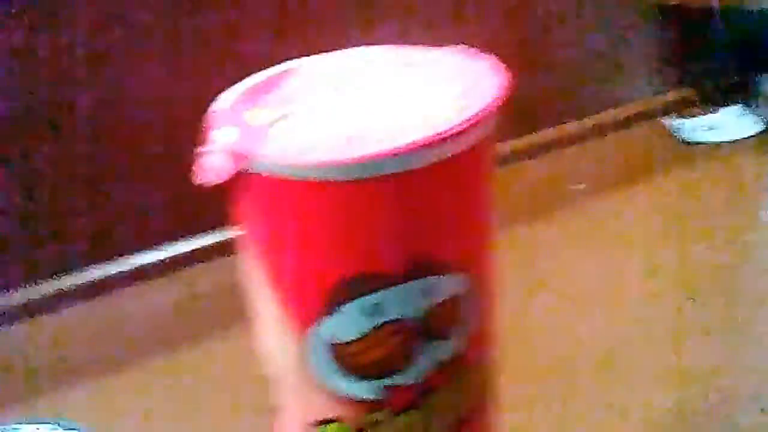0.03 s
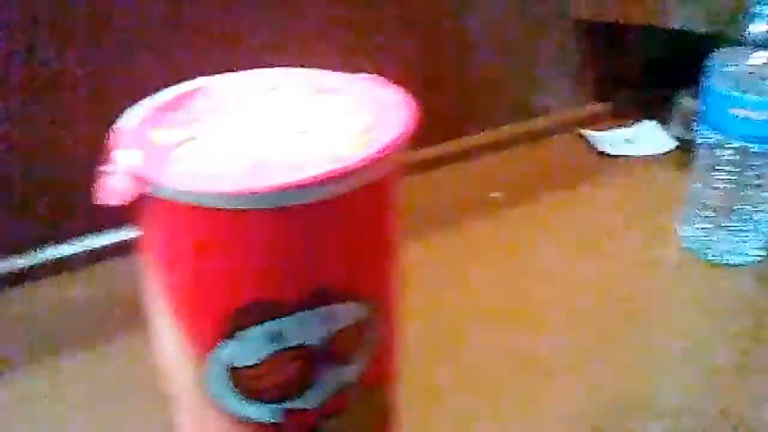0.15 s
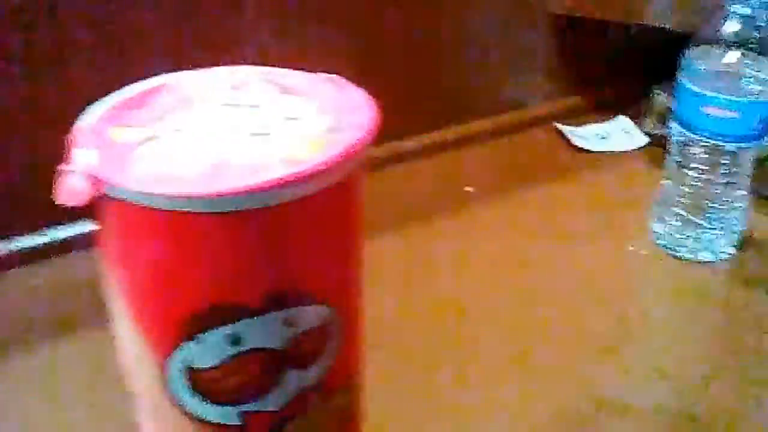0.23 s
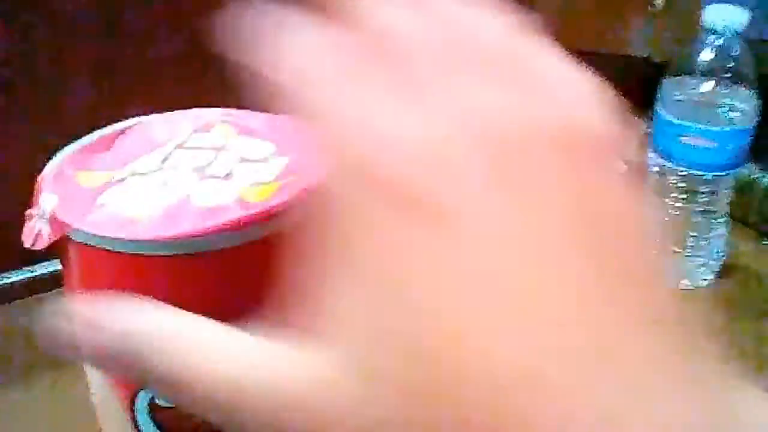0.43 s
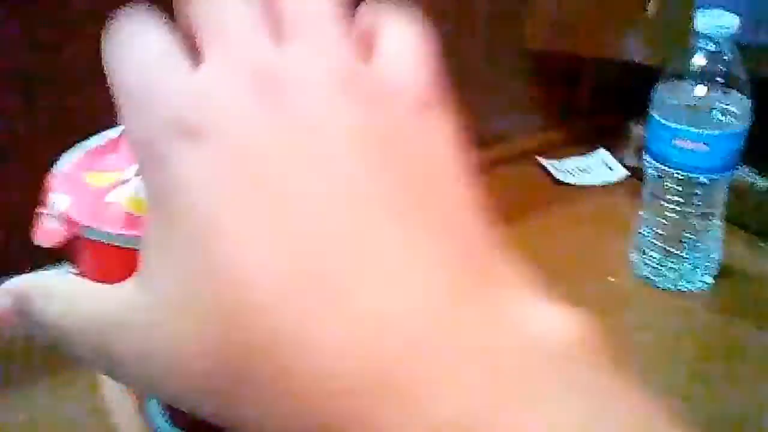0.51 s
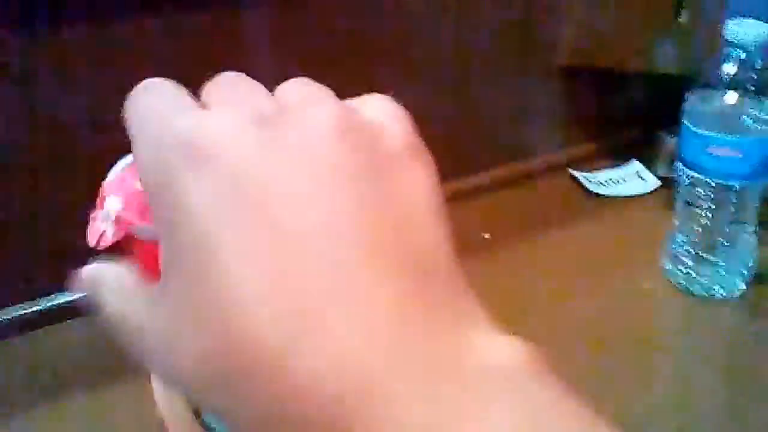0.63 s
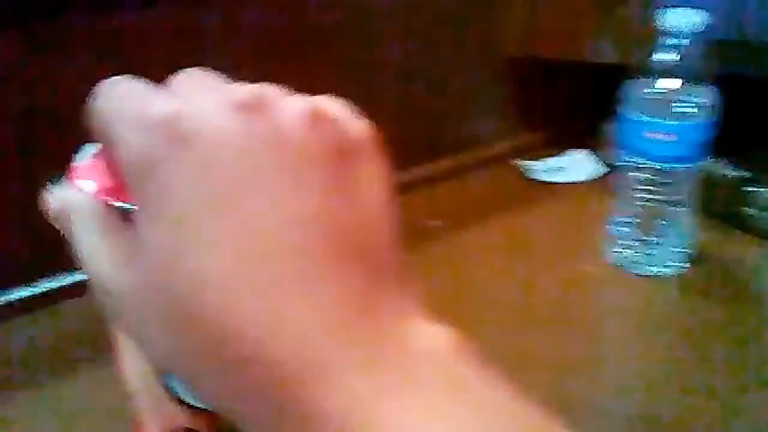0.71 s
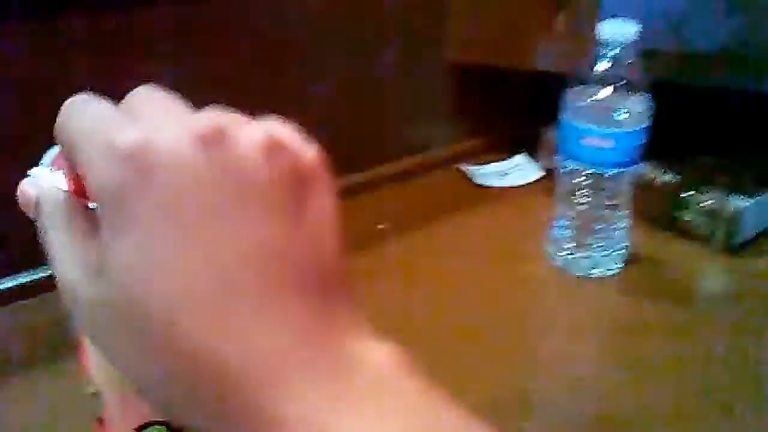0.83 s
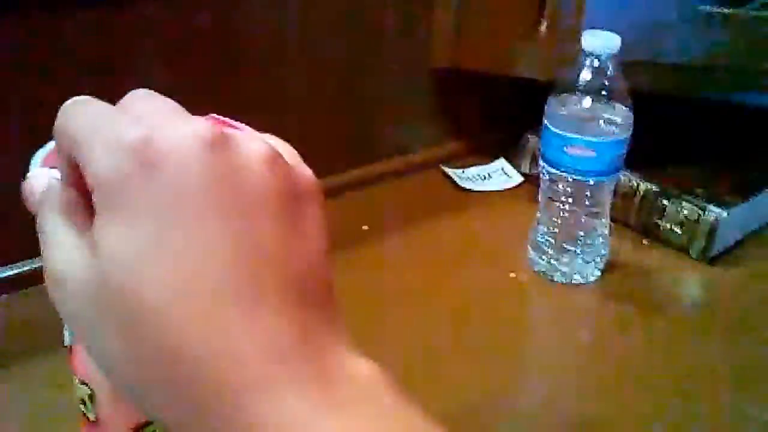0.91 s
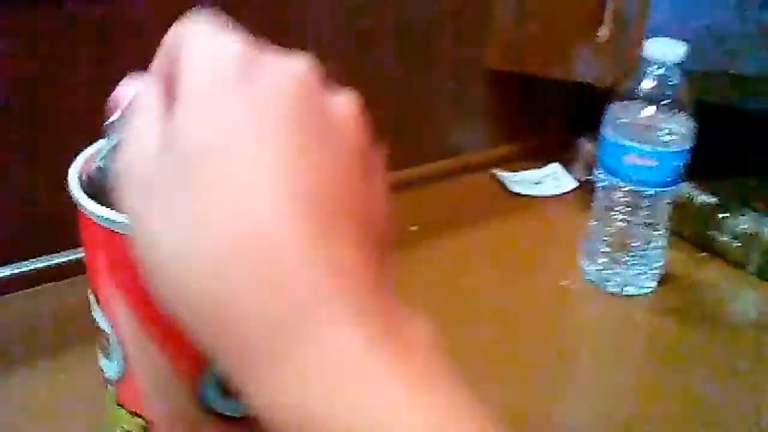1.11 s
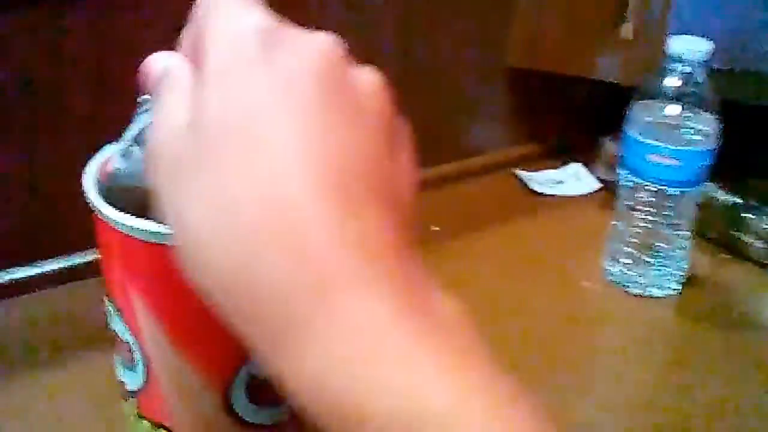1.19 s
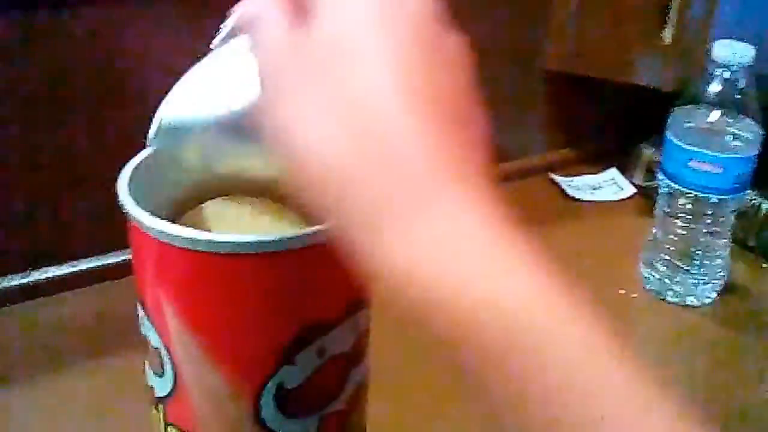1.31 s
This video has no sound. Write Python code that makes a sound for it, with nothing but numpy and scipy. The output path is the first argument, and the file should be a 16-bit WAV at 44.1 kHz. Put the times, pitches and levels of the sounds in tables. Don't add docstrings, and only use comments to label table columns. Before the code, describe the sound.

Close phone capture of a snack can lid coming off indoors: hand scraping and squeaking on the resonant tube, a near-quiet moment with a faint foil brush, then quick stepped cracks, crisp ticks and dwindling crinkles over faint hiss.

```python
import sys
import numpy as np
from scipy import signal
from scipy.fft import rfft, irfft, next_fast_len
from scipy.io import wavfile
from scipy.ndimage import uniform_filter1d, map_coordinates

SR = 44100
rng = np.random.default_rng(int(sys.argv[2]) if len(sys.argv) > 2 else 0)


def int16_out(signal):
    q = np.round(np.clip(np.atleast_2d(signal).T, -1, 1) * 32767)
    wavfile.write(sys.argv[1], SR, q.astype(np.int16))


def boost_factor(decibels):
    exponent = np.asarray(decibels, float) / 20
    return 10 ** exponent


N = 59535

# (time [s], level [dB])
RUB_EFFORT = [(0.0, -55), (0.026, -56.5), (0.052, -42.5), (0.112, -35.5), (0.178, -38), (0.232, -26),
              (0.302, -28), (0.33, -20.5), (0.354, -22), (0.362, -20), (0.378, -22.5), (0.418, -19.5),
              (0.526, -23), (0.666, -39), (0.742, -49.5), (0.78, -47), (0.866, -60), (0.88, -69.5)]
# (pitch [Hz], width [Hz], level [dB])
OPEN_MOUTH = [(635, 160, -11), (1280, 330, -6), (2280, 200, -3), (3700, 380, 4), (6100, 400, -12),
              (7400, 500, -9)]
LID_OFF_S = 1.03
GRIP_CHANGE_S = 0.024


def unit(x):
    return x / np.sqrt(np.mean(x ** 2) + 1e-20)


def along(points, hz):
    f, v = np.transpose(points)
    return np.interp(np.log(hz + 1), np.log(f + 1), v)


def level(rows):
    s, db = np.transpose(rows)
    after = db[-1] if s[-1] > 1 else -120
    return boost_factor(np.interp(np.arange(N) / SR, s, db, left=-120, right=after))


def fade(start, end, ramp_s):
    t = np.arange(N) / SR
    return np.clip(np.minimum(t - start, end - t) / ramp_s + .5, 0, 1)


def wobble(rate):
    knots = rng.standard_normal(int(N * rate / SR) + 4)
    return map_coordinates(knots, [np.arange(N) * rate / SR])


def filtered(x, response):
    m = next_fast_len(x.shape[-1] + 8192)
    spectrum = rfft(x, m) * response(np.fft.rfftfreq(m, 1 / SR))
    return irfft(spectrum, m)[..., :x.shape[-1]]


def body(peaks):
    def ring(f, k, c, w, db):
        return (-1) ** k * boost_factor(db) * 1j * f * w / (c * c - f * f + 1j * f * w)
    return lambda f: sum(ring(f, k, *peak) for k, peak in enumerate(peaks))


def colour(points):
    return lambda hz: boost_factor(along(points, hz))


def grit(grain_db, slow_db, patchy_db):
    x = rng.standard_normal(N) * boost_factor(grain_db * wobble(900) + slow_db * wobble(70.76))
    z = signal.stft(x, nperseg=256)[2]
    patches = uniform_filter1d(rng.standard_normal(z.shape), size=3, axis=0)
    patches = uniform_filter1d(patches, size=5, axis=1)
    return unit(signal.istft(z * boost_factor(patchy_db * unit(patches)), nperseg=256)[1][:N])


def hiss():
    # (pitch [Hz], level [dB per Hz])
    hiss_tone = [(24, -51), (40, 1), (886, -9), (1210, -1.5), (2760, -38), (3610, -32), (13000, -36)]
    return boost_factor(-66) * unit(filtered(rng.standard_normal(N), colour(hiss_tone)))


def room(x):
    level_db, t60_s, low_hz = -9.5, 0.39, 1800
    t = np.arange(SR // 3) / SR
    tail = rng.standard_normal(len(t)) * boost_factor(-60 * t / t60_s) * (t > .004)
    thinned = filtered(x, lambda hz: 1j * hz / (low_hz + 1j * hz))
    return boost_factor(level_db) * signal.fftconvolve(thinned, tail / np.linalg.norm(tail))[:N]


def brush():
    # (time [s], level [dB])
    stroke = [(.735, -58), (.756, -50.5), (.78, -43.5), (.82, -47.5), (.866, -54.5), (.885, -54)]
    # (pitch [Hz], width [Hz], level [dB])
    touched_foil = [(1860, 720, -6), (5960, 780, -2.5), (9800, 400, -4.5)]
    ring = body(touched_foil)
    slips = grit(grain_db=1.8, slow_db=0.4, patchy_db=0.2)
    return level(stroke) * unit(filtered(slips, lambda f: ring(f) * abs(ring(f)) ** 1.1))


def ticks():
    # (time [s], peak [dB], pitch [Hz], time to fade by 60 dB [s])
    creases = [(.9139, -21, 6550, .015), (.9196, -26.5, 6030, 0.026), (.9443, -28, 5760, 0.013),
               (.9564, -9.5, 8900, 0.0077), (.9567, -13, 10860, 0.0062), (.9751, -28, 3210, 0.022),
               (1.0426, -18, 3640, .017), (1.0369, -14, 6210, 0.014), (1.0411, -22.5, 2310, 0.033),
               (.8989, -17.5, 3015, 0.019), (.9001, -21.5, 1990, 0.023), (1.0831, -34, 2190, .061),
               (1.0871, -36.5, 560, 0.031), (1.1421, -39, 3710, .041), (1.2461, -49, 5140, .08),
               (1.2864, -43, 5860, .031), (1.2881, -48, 4300, .031), (1.2871, -45, 2000, .041),
               (1.3021, -45, 6410, .024), (1.3061, -39, 5805, 0.026), (1.3351, -48, 4900, .031),
               (.3609, -5, 3550, .0022), (.4296, -10, 4010, .0011), (.4604, -12, 4500, 0.00091),
               (.3266, -10, 5010, 0.0018), (1.0367, -12, 8730, 0.0069), (1.305, -47, 5050, .03)]
    slack_db, slack_from_s = -5, 1.2
    spike_s, spike_db = .8984, -1
    out, t = np.zeros(N + SR), np.arange(SR // 8) / SR
    for s, db, hz, t60 in creases:
        fading = boost_factor(db + slack_db * (s > slack_from_s) - 60 * t / t60)
        onset = np.clip((t + 1 / SR) / t60 * 20, 0, 1)
        out[round(s * SR):][:len(t)] += fading * np.cos(2 * np.pi * hz * t) * onset
    spike = round(spike_s * SR)
    out[spike] += boost_factor(spike_db)
    out[spike + 1:][:40] -= boost_factor(spike_db) / 40
    return out[:N]


def peel():
    # (time [s], level [dB])
    rustle = [(.88, -64), (.897, -56), (.902, -42), (.947, -50), (.955, -58), (.962, -39), (1.024, -43),
              (1.028, -56), (1.036, -62), (1.044, -38), (1.085, -38), (1.14, -45), (1.19, -56),
              (1.235, -64), (1.25, -57), (1.27, -57), (1.29, -51), (1.35, -51)]
    # (pitch [Hz], level [dB per Hz])
    foil_tone = [(35, -54), (100, -9.5), (550, -10), (2000, -5), (5000, -4.5), (13000, -14.5)]
    t = np.arange(N) / SR
    slips = grit(grain_db=2, slow_db=1.5, patchy_db=1.5)
    opened = (t > LID_OFF_S) * (t < 1.275)
    plain = boost_factor(-9 * opened) * unit(filtered(slips, colour(foil_tone)))
    ringing = boost_factor(-0.5) * opened * unit(filtered(slips, body(OPEN_MOUTH)))
    return boost_factor(4.5) * level(rustle) * (plain + ringing)


def snaps():
    # (time [s], peak [dB], crack's time to fade by 60 dB [s], note [Hz], note over crack [dB])
    releases = [(0.892, -26, 0.025, 743, 1.5), (.898, -14.5, 0.04, 794, -0.5),
                (0.8983, -23.5, 0.036, 2890, 8), (0.9026, -16.5, 0.013, 1220, 4),
                (0.9129, -12.5, 0.033, 6230, -8), (0.919, -15.5, 0.067, 1215, 0.5),
                (0.9426, -20, 0.012, 1290, -2), (.956, -6, .05, 5500, 4.5), (0.976, -17.5, 0.089, 3360, 0),
                (1.0205, -34, .03, 800, 15), (1.0364, -5, 0.042, 1210, -0.5),
                (1.037, -15, 0.047, 3564, 13.5), (1.041, -21, .03, 3830, 7), (1.087, -35, 0.048, 507, 11.5),
                (1.234, -42, 0.12, 420, 2.5), (1.245, -44.5, .08, 4880, 3), (1.285, -37, 0.066, 2000, 1),
                (1.303, -35.5, 0.055, 2900, 3), (0.312, -20, 0.081, 348, 7.5), (.326, -23, 0.019, 4400, 4),
                (0.361, -12, 0.066, 518, 9), (0.4, -15, 0.023, 900, -28), (.429, -17, .02, 900, -7),
                (0.656, -23.5, 0.2, 5400, 2.5)]
    # (pitch [Hz], level [dB per Hz])
    crack_tone = [(35, -38), (150, -6.5), (400, -11), (1000, -0.5), (4000, 0), (13000, -7.5)]
    rise_s, note_t60_s, sharp_t60_s = 0.00056, 0.037, 0.021
    sharp_share = 0.77
    out, t = np.zeros(N + SR), np.arange(SR // 5) / SR
    for s, db, t60, hz, note_db in releases:
        white = rng.standard_normal(len(t))
        noise = unit(filtered(white, colour(crack_tone)))
        noise = noise + (s > LID_OFF_S) * boost_factor(-26) * unit(filtered(white, body(OPEN_MOUTH)))
        sharp = sharp_share * boost_factor(-60 * t / sharp_t60_s)
        soft = (1.3 - sharp_share) * boost_factor(-60 * t / t60)
        note = boost_factor(note_db - 60 * t * (1 + hz / 3000) / note_t60_s) * np.sin(2 * np.pi * hz * t)
        hit = (1 - np.exp(-t / rise_s)) * (noise * (sharp + soft) + note)
        out[round(s * SR):][:len(t)] += boost_factor(db - 8) * hit
    return out[:N]


def squeaks():
    # (start [s], end [s], pitch [Hz], level over the rubbing [dB])
    skin_squeaks = [(0.038, 0.186, 5352, -6), (.061, 0.087, 6952, -8), (0.05, .171, 4062, -7.5),
                    (0.097, .181, 1232, -6.5), (0.192, .263, 1869, -6.5), (0.22, .266, 5582, -4.5),
                    (.321, .349, 5762, -6.5), (.325, 0.39, 3900, -8), (.399, 0.45, 4989, -5),
                    (.416, 0.47, 5502, -8), (.401, .451, 1114, -12), (.491, 0.596, 1647, -10),
                    (0.487, 0.564, 2022, -13.5), (.626, .673, 5382, -2), (0.632, 0.7, 4002, -3.5),
                    (0.082, 0.13, 850, -11)]
    waver_db, drift_rad = 3.5, 1.5
    t, out = np.arange(N) / SR, np.zeros(N)
    for start, end, hz, db in skin_squeaks:
        loudness = fade(start, end, .012) * boost_factor(db + waver_db * wobble(90))
        out = out + loudness * np.sin(2 * np.pi * hz * t + drift_rad * wobble(69.8))
    return level(RUB_EFFORT) * out


def tube():
    # (pitch [Hz], level [dB])
    air_notes = [(898, 2), (938, -9)]
    start_s, end_s = 0.3967, .77
    waver_db, drift_rad = 2.8, 0.85
    t = np.arange(N) / SR
    sag_hz = 7 * np.exp(-((t - .59) / 0.037) ** 2)
    song = np.zeros(N)
    for hz, db in air_notes:
        phase = 2 * np.pi * np.cumsum(hz - sag_hz) / SR + drift_rad * wobble(39.7)
        song = song + boost_factor(db + waver_db * wobble(45.6)) * np.sin(phase)
    thinning_db = -4 * np.clip((t - .6) * 20, 0, 1)
    tiring_db = -13 * np.clip(t - start_s, 0, .35)
    slip_db = -19 * np.exp(-((t - 0.6) / 0.0054) ** 2)
    return fade(start_s, end_s, GRIP_CHANGE_S) * level(RUB_EFFORT) * boost_factor(thinning_db + tiring_db + slip_db) * song


def rubbing():
    # (pitch [Hz], level [dB per Hz])
    grit_tone = [(24, -51.5), (50, -11.5), (250, -7.5), (450, -3), (1500, 4), (4000, -1.5), (13000, -8)]
    # (start [s], end [s], ringing over plain grit [dB])
    grips = [
        (0, 0.048, 4),
        (0.064, 0.187, 2.5),
        (0.18, 0.313, -1),
        (0.285, 0.419, -3.5),
        (0.392, 0.628, -3),
        (0.606, 0.76, -2),
    ]
    # (pitch [Hz], width [Hz], level [dB])
    loose = [(576, 12, -8.5), (976, 26, -4), (1223, 176, -6.5), (2370, 120, -8.5), (4050, 210, -15.5),
             (5340, 92, -7), (7290, 120, -13.5), (9340, 74, -12.5)]
    # (pitch [Hz], width [Hz], level [dB])
    tilted = [(613, 65, -8.5), (1830, 90, -13), (2670, 180, -10.5), (3530, 410, -5.5), (4400, 260, -5.5),
              (5510, 380, -6.5)]
    # (pitch [Hz], width [Hz], level [dB])
    rocking = [(172, 52, -12.5), (266, 28, -6.5), (364, 65, 1), (420, 50, 4), (600, 94, 1),
               (5570, 760, -9.5)]
    # (pitch [Hz], width [Hz], level [dB])
    held = [(420, 74, -3), (1114, 31, 6), (1680, 110, -0.5), (1954, 59, -0.5), (3095, 19, 6.5),
            (3920, 100, 4.5), (4870, 200, 3), (5530, 560, -1), (6600, 410, -8.5)]
    touch = [(900, 30, 1.5), (5500, 500, -14)]
    let_go = [(420, 28, -18), (1658, 170, -6.5), (3080, 80, -4.5), (3980, 90, -7.5), (5340, 130, -1)]
    bodies = [touch, loose, tilted, rocking, held, let_go]
    light_s, light_db, light_hz = 0.65, -7.5, 1300
    t = np.arange(N) / SR
    out = unit(filtered(grit(grain_db=2, slow_db=1, patchy_db=2), colour(grit_tone)))
    lows = filtered(out, lambda hz: 1 / (1 + (hz / light_hz) ** 4))
    out = out - lows * (1 - boost_factor(light_db)) * np.clip((t - light_s) / 0.037 + .5, 0, 1)
    for (start, end, db), peaks in zip(grips, bodies):
        ringing = unit(filtered(grit(grain_db=0, slow_db=0.5, patchy_db=-0.5), body(peaks)))
        out = out + boost_factor(db) * fade(start, end, GRIP_CHANGE_S) * ringing
    return boost_factor(-1) * level(RUB_EFFORT) * out


def scene():
    hits = snaps()
    foil = brush() + peel() + hits + ticks()
    can = rubbing() + tube() + squeaks()
    mono = hiss() + room(hits) + foil + can
    return np.array([mono, mono])


def microphone(x):
    # (pitch [Hz], gain [dB])
    mic_tone = [(3000, -3), (4700, 0), (5700, 3.5), (6800, 1.5), (7700, -10), (8400, -12), (10000, -8.5),
                (13000, -19)]
    return filtered(x, lambda hz: boost_factor(along(mic_tone, hz)) * np.where(hz < 13200, 1, boost_factor(-30)))


def treble_patches(mono):
    # (start [s], end [s])
    patch_times = [
        (0, .35),
        (.4, .86),
        (.893, .93),
        (.975, 1.03),
        (1.037, 1.135),
        (1.2, 1.275),
        (1.295, 1.35),
    ]
    # (pitch [Hz], share [0 to 1])
    patch_share = [(4200, 0), (4400, .5), (6000, .65), (8000, .65), (9000, .9), (13000, .85)]
    hz, t, z = signal.stft(mono, SR, nperseg=512)
    draw = rng.random((len(hz) // 9 + 1, len(t) // 7 + 1))
    draw = draw.repeat(9, 0).repeat(7, 1)[:len(hz), :len(t)]
    in_time = np.any([(t > a) & (t < b) for a, b in patch_times], axis=0)
    on = (draw < along(patch_share, hz)[:, None]) & in_time
    strength = np.sqrt(uniform_filter1d(abs(z) ** 2, size=5, axis=0) / 4)
    boost = boost_factor(np.where(hz > 8000, 3.75, 0.75))[:, None]
    noise = rng.standard_normal(z.shape) + 1j * rng.standard_normal(z.shape)
    side = signal.istft(boost * strength * noise * on, SR, nperseg=512)[1][:N]
    return np.array([mono + side, mono - side])


def roll_off(x):
    return signal.sosfilt(signal.butter(12, 14440, fs=SR, output="sos"), x)


def record(dry):
    mix = treble_patches(microphone(dry[0]))
    return roll_off(mix)


dry = scene()
out = record(dry)
int16_out(out)
```